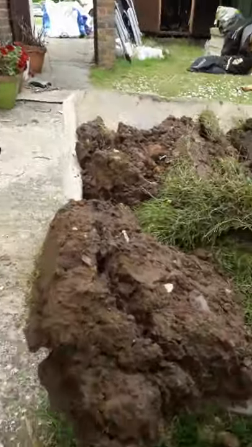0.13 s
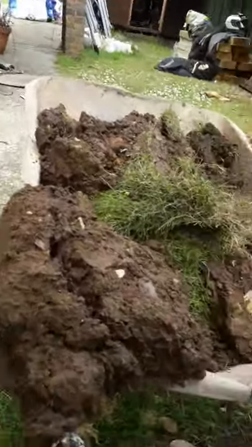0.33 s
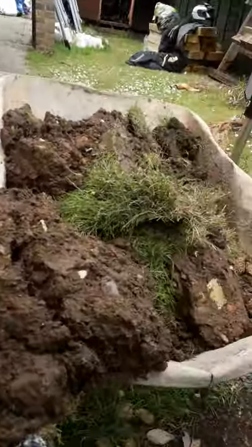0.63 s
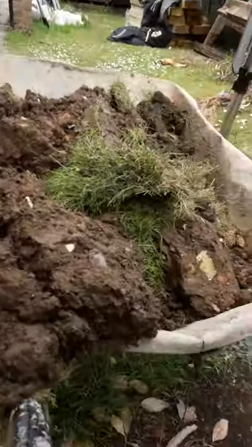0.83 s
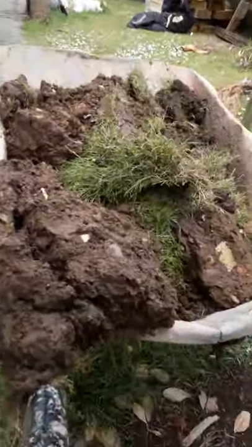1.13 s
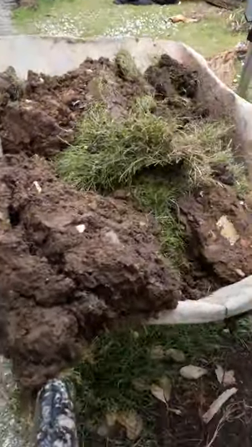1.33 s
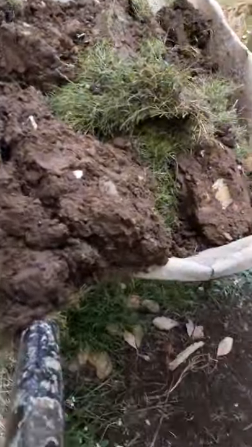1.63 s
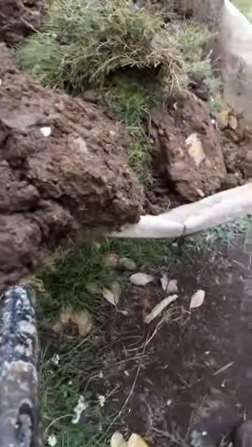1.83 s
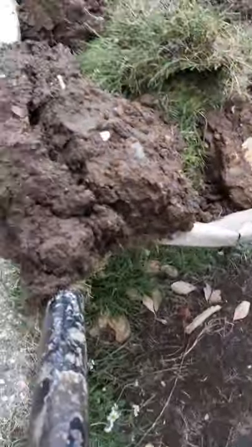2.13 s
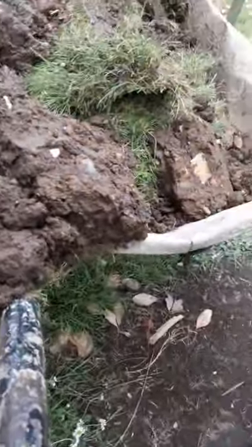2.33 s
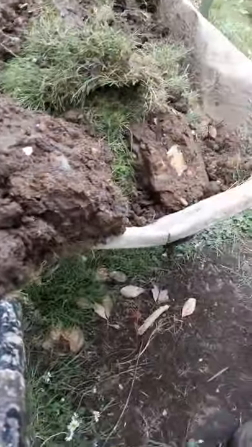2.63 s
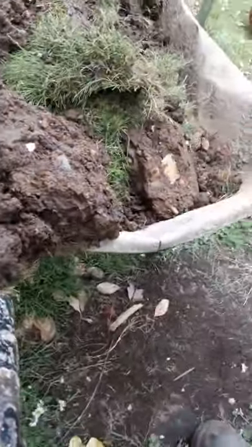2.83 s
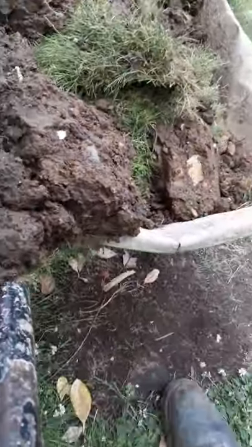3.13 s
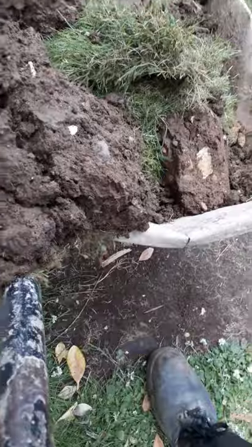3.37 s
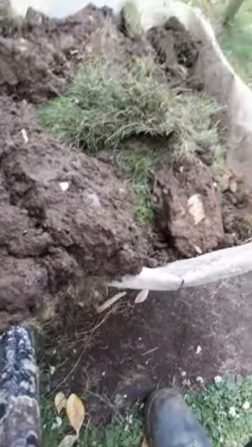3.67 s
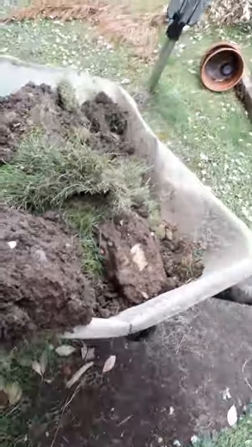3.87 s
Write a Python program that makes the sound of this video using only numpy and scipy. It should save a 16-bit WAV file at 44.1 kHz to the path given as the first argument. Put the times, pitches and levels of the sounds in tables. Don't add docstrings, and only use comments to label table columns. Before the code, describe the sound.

A loaded wheelbarrow's dry wheel gives a loud, piercing squeal after nearly three seconds of soft grass rustling, boot scuffs and twig snaps; it stalls, then squeals again. Close microphone in an open garden.

```python
import sys
import numpy as np
from scipy import signal
from scipy.io import wavfile

SR = 44100
rng = np.random.default_rng(int(sys.argv[2]) if len(sys.argv) > 2 else 0)


def generate_wav(sig):
    pcm = np.round(np.clip(np.atleast_2d(sig).T, -1, 1) * 32767).astype(np.int16)
    wavfile.write(sys.argv[1], SR, pcm)


def level_to_linear(level):
    exponent = np.asarray(level, float) / 20
    return 10 ** exponent


N = 176400

# (frequency [Hz], density [dB per Hz])
HUM_SPECTRUM = [(25, -23.5), (80, -5), (320, -3), (500, -8), (950, -3.5), (2300, -27), (7800, -21),
                (15900, -45.5)]
# (time [s], level [dB])
RUSTLE_LEVEL = [(0.0, -55.5), (.12, -50.5), (.3, -50.5), (.385, -57.5), (.43, -52.5), (.65, -51.5),
                (.85, -48), (.95, -59), (1.15, -61.5), (1.41, -49), (1.53, -54), (1.6, -62), (1.88, -59),
                (2.08, -50.5), (2.17, -60.5)]
# (frequency [Hz], density [dB per Hz])
RUSTLE_SPECTRUM = [(410, -26), (700, -9), (909, -10), (1440, -2), (4710, -0.5), (8160, -2), (9420, -2),
                   (12100, -3), (15900, -0.5)]
# (time [s], length [s], level [dB])
GUSTS = [
    (0.104, 0.21, -57.5),
    (0.386, 0.39, -53.5),
    (1.33, 0.23, -55.5),
    (1.853, 0.27, -59),
    (2.484, 0.49, -58.5),
    (3.718, .07, -53),
    (3.844, 0.32, -43),
    (3.941, 0.11, -45),
]
# (delay [s], level [dB])
WALL_ECHOES = [
    (.021, -27.5),
]
# (time [s], length [s], level [dB], centre
# [Hz])
SCUFFS = [(.045, 0.11, -48, 9700), (0.5554, 0.059, -42, 4850), (.708, 0.034, -39, 5300),
          (1.235, 0.057, -42, 5000), (1.8, 0.098, -65.5, 6900), (1.5, 0.12, -55, 460),
          (0.87, 0.15, -57, 2500), (1.7, 0.063, -59, 8800), (.14, 0.17, -51, 3600), (.6, 0.19, -54.5, 1960),
          (1.39, 0.055, -51, 4600), (1.485, 0.059, -54.5, 4800), (1.8, 0.042, -56, 5500),
          (2.3, 0.097, -57, 6900), (2.49, 0.046, -60, 8000), (1.72, .2, -57, 290), (1.93, .16, -55.5, 420),
          (.725, 0.067, -50, 910), (2.3, 0.068, -57, 470), (3.745, 0.033, -44.5, 420),
          (3.62, 0.052, -39.5, 440), (.54, .06, -52.5, 900)]
# (time [s], length [s], level [dB],
# pitch [Hz])
HISSES_AND_PIPES = [(0.037, 0.049, -47.5, 8100), (0.185, 0.14, -43, 8220), (0.303, 0.075, -52, 4790),
                    (.33, .3, -58.5, 4810), (0.743, 0.16, -48.5, 4810), (1.959, 0.21, -50, 4860),
                    (2.291, 0.086, -59, 4840), (.5, 0.35, -59, 4850), (1.084, .06, -61, 4800),
                    (1.58, .07, -56, 1000), (1.86, 0.37, -62.5, 4810), (3.707, 0.033, -51, 1000),
                    (3.704, 0.032, -60, 2000)]
# (time [s], peak [dB], pitch [Hz])
SNAPS = [(0.0909, -29.5, 3600), (0.132, -23, 3720), (0.683, -31, 3400), (0.7683, -22.5, 4800),
         (0.916, -38, 3600), (0.953, -33, 3020), (1.0424, -40.5, 3400), (.543, -42, 2800),
         (1.1813, -33.5, 4800), (1.2103, -36, 3600), (1.325, -29, 3870), (1.576, -44, 7500),
         (1.595, -49, 3500), (1.632, -42, 4500), (1.8208, -29, 2760), (1.861, -48.5, 7970),
         (2.142, -26.5, 4700), (2.2369, -31, 1850), (2.25, -39.5, 6000), (2.375, -47, 5940),
         (2.394, -37.5, 7870), (2.436, -48.5, 3200), (2.487, -46, 2200), (2.54, -51, 6000),
         (2.571, -52, 4200), (2.6, -44, 3000), (2.654, -40, 7800), (2.686, -43, 4200),
         (2.9794, -31.5, 11000), (3.162, -32.5, 5200), (3.266, -35, 5000), (3.475, -38, 13400),
         (3.797, -34, 3000), (3.943, -20, 5500)]
# (time [s], peak [dB], pitch [Hz])
KNOCKS = [(0.711, -30.5, 176), (.24, -47, 453), (.77, -42, 352), (1.134, -43, 905), (3.475, -42, 260),
          (1.231, -33.5, 646), (1.327, -33.5, 192), (1.634, -38, 466), (1.819, -31, 175), (2.14, -32, 202),
          (2.236, -28.5, 640), (3.273, -35, 151), (3.34, -38.5, 704), (3.851, -31, 668),
          (3.944, -19, 599.5)]
# (time [s], slip rate [Hz], first partial [dB], second partial [dB], higher overtones [dB])
GRAB = [
    (2.695, 559, -95, -100, -100),
    (2.712, 620, -51, -80, -75),
    (2.728, 841, -42, -67, -60.5),
    (2.75, 833.6, -27.5, -44, -35.5),
    (2.8, 860, -27, -38.5, -35),
    (2.825, 819.6, -26.5, -42.5, -38),
]
# (time [s], slip rate [Hz], first partial [dB], second partial [dB], higher overtones [dB])
SQUEAL = [
    (2.86, 888.5, -20, -45.5, -32.5),
    (2.94, 903.3, -16, -45, -31),
    (3.055, 906.3, -13, -48, -30.5),
    (3.105, 902.6, -14, -37.5, -28),
    (3.165, 915.1, -15, -41.5, -27.5),
    (3.265, 924.4, -27.5, -34.5, -26.5),
    (3.4, 932, -22.5, -43, -30),
    (3.47, 924.5, -22, -43.5, -30.5),
    (3.548, 914.3, -27.5, -44, -36),
]
# (time [s], slip rate [Hz], first partial [dB], second partial [dB], higher overtones [dB])
STALL = [
    (3.562, 847.4, -37.5, -46, -35),
    (3.588, 824.3, -46.5, -34, -27),
    (3.598, 718, -38.5, -39, -35),
    (3.614, 671.5, -37.5, -36, -32.5),
    (3.624, 407.7, -41, -42, -39),
    (3.645, 387.2, -35.5, -42, -41),
    (3.66, 371, -40, -45, -53),
    (3.682, 349.4, -60, -85, -62),
    (3.736, 769, -83, -90, -75),
]
# (time [s], slip rate [Hz], first partial [dB], second partial [dB], higher overtones [dB])
SECOND_PUSH = [
    (3.743, 781, -44, -55, -35.5),
    (3.766, 831, -39, -42, -29.5),
    (3.791, 845.6, -41.5, -34.5, -30),
    (3.818, 853, -41, -31.5, -30),
    (3.834, 881, -40.5, -49, -34.5),
    (3.862, 921.3, -33, -32, -32.5),
    (3.921, 939, -33, -28, -36.5),
    (4.0, 934.4, -32.5, -27, -30.5),
]
# (time [s], share [0-1])
JUDDER_SHARE = [
    (2.8, 0.95),
    (2.825, 0.43),
    (2.85, 0.0),
    (3.585, 0.01),
    (3.612, 0.15),
    (3.63, 0.39),
    (3.7, 0.4),
    (3.75, 0.02),
]
# (time [s], level [dB])
HALF_SLIP_LEVEL = [
    (2.88, -110),
    (2.97, -55),
    (3.3, -45.5),
    (3.48, -47),
    (3.56, -110),
]
HALF_SLIP_LINES = [-16, -7.5, -2, 1.5, -12]
# (frequency [Hz], level [dB])
OVERTONE_SPECTRUM = [(1700, -3), (2800, -5), (5500, -11), (8000, -9.5), (9700, -16.5), (12000, -14),
                     (15500, -14.5)]
# (frequency [Hz], width [Hz],
# gain [dB])
FRAME_AND_TUB_MODES = [(1183, 150, 17), (2016, 63, 15), (2500, 64, 9), (2729, 23.7, 10), (2780, 24, -5),
                       (2798, 32, 8), (3667, 39, 12), (4218, 120, 11.5), (3575, 49, -12), (4505, 31, 8),
                       (4663, 80, -9.5), (5087, 60, 15.5), (5430, 74, 9), (5500, 26, 8.5),
                       (6335, 37, -8), (6490, 390, -1), (6830, 54, 8.5), (7240, 51, 4.5), (7385, 62, 8.5),
             (8140, 60, 2), (8460, 44, 8.5), (11000, 45, 5), (11180, 50, 8.5), (11890, 106, 10),
             (12030, 100, 9.5), (13900, 60, 9), (14700, 90, 13.5), (15370, 60, 8)]
# (frequency [Hz], width [Hz], level [dB])
SCRAPE_MODES = [
    (2000, 90, -9),
    (3010, 160, -7),
    (4250, 130, -6.5),
]


def rms_one(x):
    return x / np.sqrt(np.mean(x ** 2) + 1e-20)


def in_time(rows):
    s, *columns = np.transpose(rows)
    return [np.interp(np.arange(N) / SR, s, c) for c in columns]


def at_hz(points, hz):
    table_hz, db = np.transpose(points)
    return np.interp(np.log(hz), np.log(table_hz), db)


def drift(rate):
    r = np.exp(-80 * np.pi * rate / SR)
    noise = rng.standard_normal(N // 40 + 2002)
    slow = signal.lfilter([1], [1, -2 * r, r * r], noise)[2000:]
    return np.interp(np.arange(N) / 40, np.arange(len(slow)), rms_one(slow))


def band(x, low_hz, high_hz):
    edges = [low_hz, min(high_hz, .47 * SR)]
    return signal.sosfilt(signal.butter(2, edges, "band", fs=SR, output="sos"), x)


def ring(x, hz, t60):
    r = level_to_linear(-60 / (t60 * SR))
    w = 2 * np.pi * hz / SR
    return signal.lfilter([0, np.sin(w)], [1, -2 * r * np.cos(w), r * r], x)


def add(out, s, x):
    i = int(s * SR)
    out[i:i + len(x)] += x[:N - i]


def swell(length_s, attack):
    u = np.linspace(0, 1, int(length_s * SR))
    return np.minimum(u / attack, 1) * np.sqrt(np.clip((1 - u) / .5, 0, 1))


def banded_noise(spectrum, patchy_db, grain_db):
    out, together = 0, drift(14)
    edges = 25 * 2 ** np.arange(0, 9.6, .5)
    white = rng.standard_normal((2, N)) * level_to_linear(grain_db * drift(150))
    for k, (low, high) in enumerate(zip(edges, edges[1:])):
        flicker_db = patchy_db * (together + drift(16.6))
        gain = level_to_linear(at_hz(spectrum, np.sqrt(low * high)) + flicker_db)
        out = out + gain * band(white[k % 2], low, high)
    return rms_one(out)


def garden():
    hum_db, wind_db, lumps_db = -60, -62.5, 3.0
    stir_db, = in_time(RUSTLE_LEVEL + [(2.9, -61.5)])
    rustle = level_to_linear(stir_db) * banded_noise(RUSTLE_SPECTRUM, patchy_db=1.8, grain_db=2.0)
    hum = level_to_linear(hum_db) * banded_noise(HUM_SPECTRUM, patchy_db=-1.0, grain_db=1.1)
    wind = rms_one(band(rng.standard_normal(N), 54.6, 144.4) * level_to_linear(lumps_db * drift(17.4)))
    gusts = np.full(N, level_to_linear(wind_db))
    for s, length, db in GUSTS:
        add(gusts, s, level_to_linear(db) * swell(length, attack=0.45))
    return rustle + hum + gusts * wind


def stalk_ticks():
    ticks_per_s, tick_db = 20, -54.5
    strength = level_to_linear(tick_db + 5.0 * np.minimum(rng.exponential(1, N), 3))
    born = (rng.random(N) < ticks_per_s / SR) * strength
    dealt = rng.integers(0, 6, N)
    pitches = np.geomspace(2000, 9000, 6)
    return sum(ring(born * (dealt == k) + 1e-18, hz, 0.0021) for k, hz in enumerate(pitches))


def hisses_and_pipes():
    out = np.zeros(N)
    for s, length, db, hz in HISSES_AND_PIPES:
        width_hz = 300 if hz > 6000 else 67
        shape = np.hanning(int(1.3 * length * SR))
        tone = ring(rng.standard_normal(SR), hz, 2.0 / width_hz)[-len(shape):]
        add(out, s, level_to_linear(db) * shape * rms_one(tone))
    return out


def scuffs():
    out = np.zeros(N)
    for s, length, db, hz in SCUFFS:
        shape = swell(length, attack=0.15)
        noise = rng.standard_normal(SR // 4)[:len(shape)]
        brush = band(noise, hz / 2.34, hz * 1.84)
        airy_top = .5 * band(noise, 14000, 16000) * (hz > 4000)
        add(out, s, level_to_linear(db) * shape * rms_one(brush + airy_top))
    return out


def snaps():
    out, t = np.zeros(N), np.arange(SR // 20) / SR
    crack_db, gain_db = 3.5, 2.5
    for s, db, hz in SNAPS:
        crack = (.2 * rng.standard_normal(len(t)) + (t == 0)) * np.exp(-t / 0.00097)
        tone = rms_one(ring(crack, hz, 0.002))
        snap = tone + level_to_linear(crack_db) * rms_one(band(crack, 0.57 * hz, 2.52 * hz))
        add(out, s, level_to_linear(db + gain_db) * snap / abs(snap).max())
    return out


def knocks():
    out, t = np.zeros(N), np.arange(SR // 20) / SR
    ring_cycles, puff_db, puff_s = 6.6, -0.5, 0.0025
    for s, db, hz in KNOCKS:
        puff = band(rng.standard_normal(len(t)) * t * np.exp(-t / puff_s), 148, 1040)
        bump = np.exp(-((t * hz - .55) / 0.15) ** 2)
        knock = rms_one(ring(bump, hz, ring_cycles / hz)) + level_to_linear(puff_db) * rms_one(puff)
        add(out, s, level_to_linear(db) * knock / abs(knock).max())
    return out


def frame_overtones(hz, slip_hz, phase):
    over = 0
    ripple_db = 3 * rng.standard_normal(1000)
    for k in range(3, 36):
        f = k * slip_hz[::16]
        lift = 1
        for mode_hz, width, db in FRAME_AND_TUB_MODES:
            lift = lift + (level_to_linear(db) - 1) / (1 + (2 * (f - mode_hz) / width) ** 2)
        small_db = np.interp(k * hz[::16] / 29.88, np.arange(len(ripple_db)), ripple_db)
        gain = abs(lift) * level_to_linear(at_hz(OVERTONE_SPECTRUM, f) + small_db) * (f < 15850)
        shimmer = level_to_linear(4.6 * min(k / 9, 1) * drift(22))
        gain = np.repeat(gain, 16)[:N] * shimmer
        over = over + gain * np.sin(k * phase + rng.uniform(0, 2 * np.pi))
    return over


def scraping(judder):
    grit_db, judder_grit_db, roll_db = -20.5, -9, -31.5
    grit = band(rng.standard_normal(N), 930, 6900) + 0.44 * band(rng.standard_normal(N), 11200, 14000)
    grit = grit * (level_to_linear(grit_db) + judder * level_to_linear(judder_grit_db))
    scrape = rng.standard_normal(N)
    rung = sum(level_to_linear(db) * rms_one(ring(scrape, hz, 2.2 / width)) for hz, width, db in SCRAPE_MODES)
    roll = level_to_linear(roll_db) * rms_one(band(rng.standard_normal(N), 200, 466))
    return grit + judder * rung + roll


def axle():
    judder_hz, swing_hz, depth, lead_rad, thud_db = 170.1, 137.5, 0.7, 2.1, -22.5
    hz, first_db, second_db, over_db = in_time(GRAB + SQUEAL + STALL + SECOND_PUSH)
    judder = np.clip(in_time(JUDDER_SHARE)[0], 0, 1)
    beat = 2 * np.pi * np.cumsum(judder_hz * (1 + .02 * drift(31))) / SR
    swing = judder * swing_hz * hz / 845 * np.cos(beat + lead_rad)
    slip_hz = hz + 1.2 * drift(38.5) + swing
    phase = 2 * np.pi * np.cumsum(slip_hz) / SR
    throb = (1 + judder * depth * np.cos(beat)) * level_to_linear(judder * drift(91))

    over = level_to_linear(-4) * frame_overtones(hz, slip_hz, phase) + scraping(judder)
    thud = judder * level_to_linear(thud_db) * (np.sin(beat) + 1.34 * np.sin(2 * beat))
    first = level_to_linear(first_db) * (throb * np.sin(phase) + thud)
    second = level_to_linear(second_db) * throb * np.sin(2 * phase)
    half = sum(level_to_linear(db) * np.sin((k + .5) * phase + k) for k, db in enumerate(HALF_SLIP_LINES))
    half = level_to_linear(in_time(HALF_SLIP_LEVEL)[0]) * half
    return np.sqrt(2) * (first + second) + level_to_linear(over_db) * over * np.sqrt(abs(throb)) + half


def scene():
    background = garden()
    near = stalk_ticks() + hisses_and_pipes() + scuffs() + snaps() + knocks() + axle()
    out, dull = near + background, band(near, 153, 7600)
    for s, db in WALL_ECHOES:
        add(out, s, level_to_linear(db) * dull)
    return out[None]


def low_pass(x):
    return signal.sosfilt(signal.butter(12, 16040, fs=SR, output="sos"), x)


def record(dry):
    mix = band(dry, 45, 15200) - .5 * band(dry, 7870, 10210)
    return low_pass(mix)


dry = scene()
out = record(dry)
generate_wav(out)
```